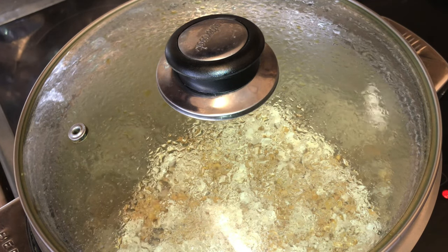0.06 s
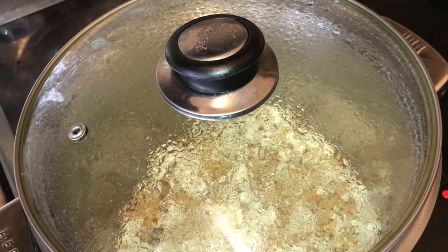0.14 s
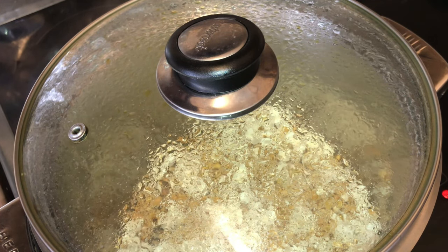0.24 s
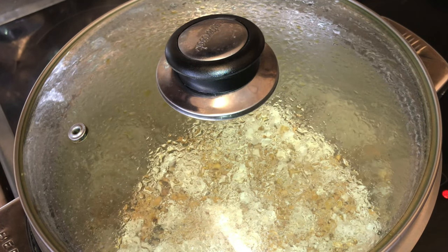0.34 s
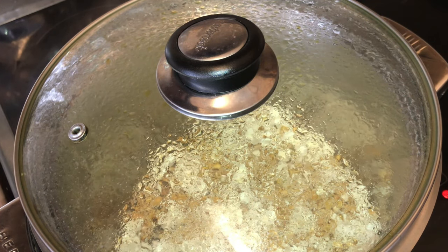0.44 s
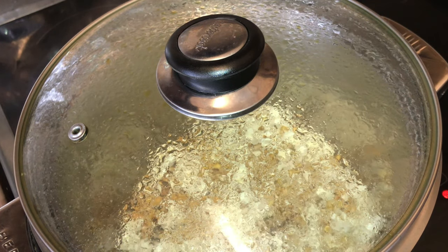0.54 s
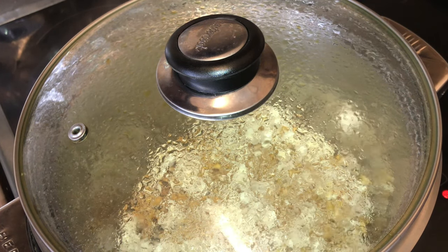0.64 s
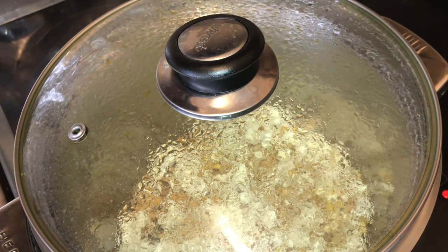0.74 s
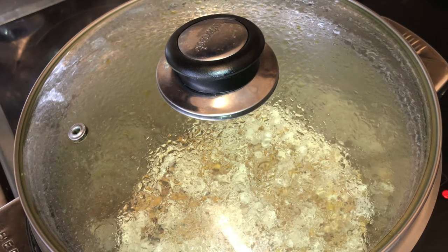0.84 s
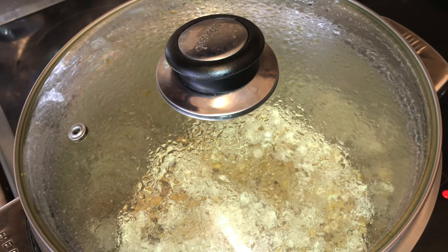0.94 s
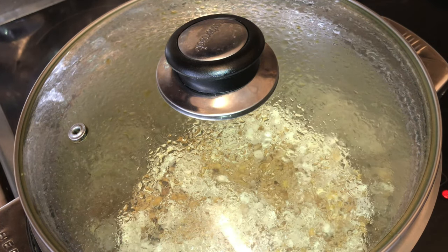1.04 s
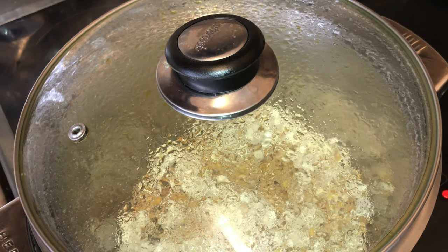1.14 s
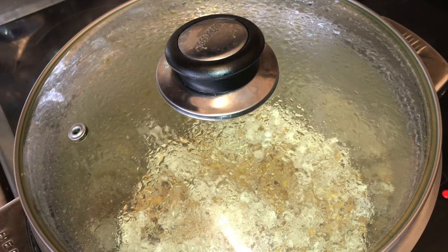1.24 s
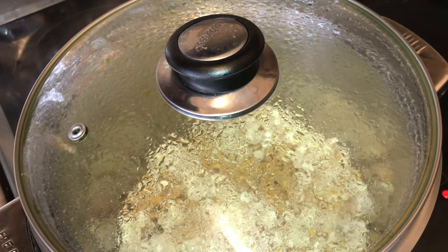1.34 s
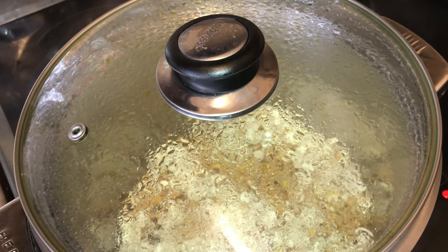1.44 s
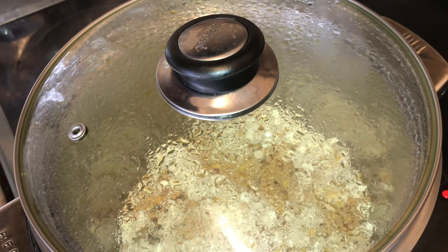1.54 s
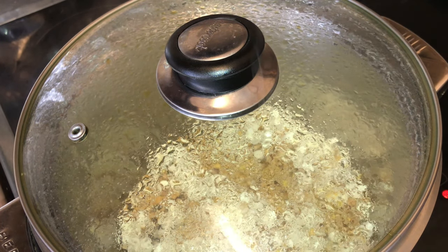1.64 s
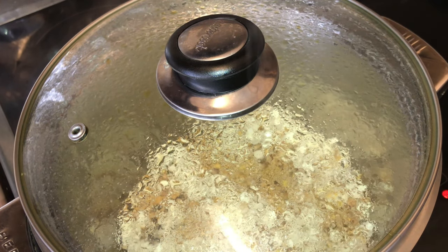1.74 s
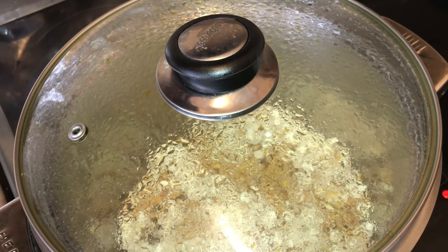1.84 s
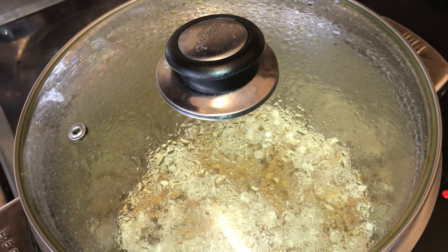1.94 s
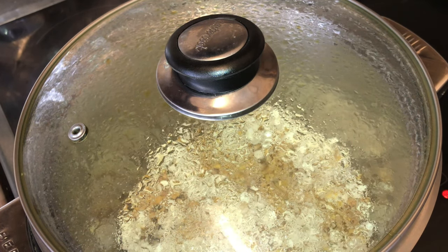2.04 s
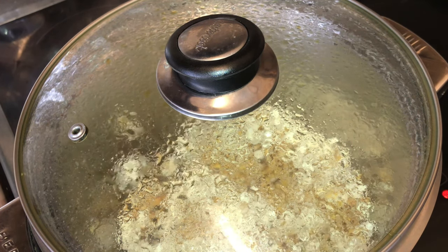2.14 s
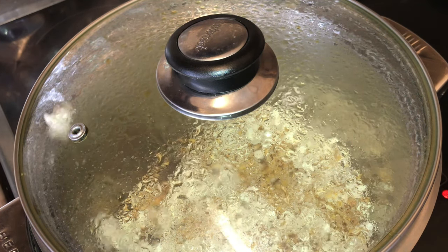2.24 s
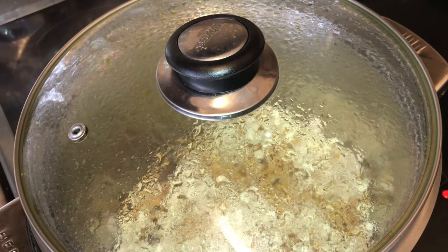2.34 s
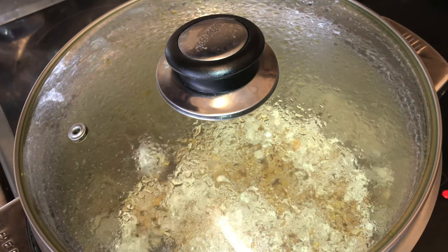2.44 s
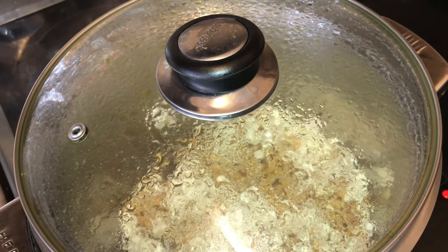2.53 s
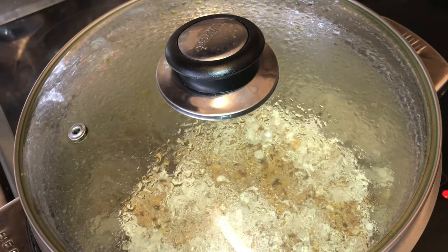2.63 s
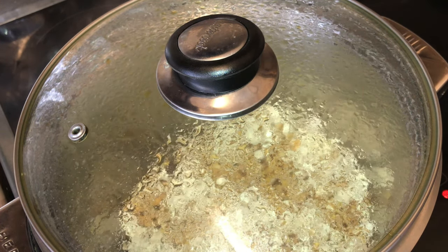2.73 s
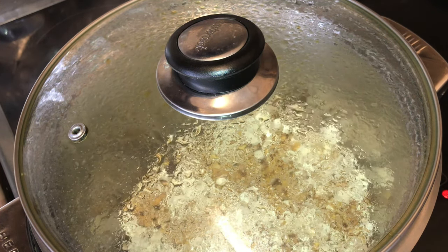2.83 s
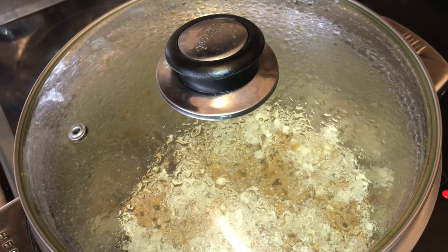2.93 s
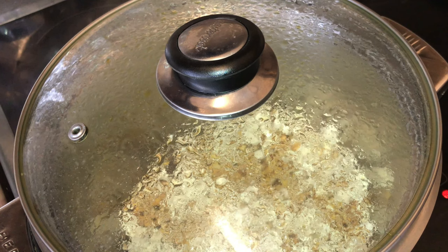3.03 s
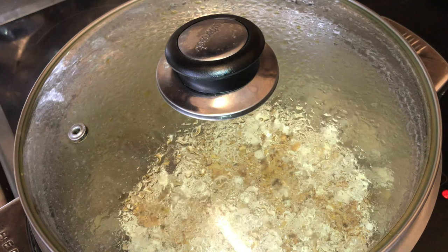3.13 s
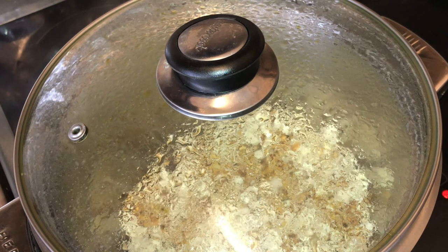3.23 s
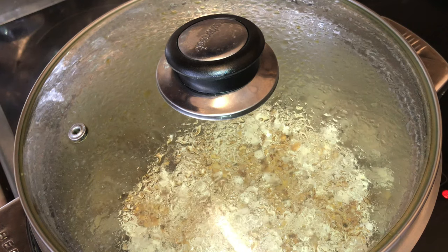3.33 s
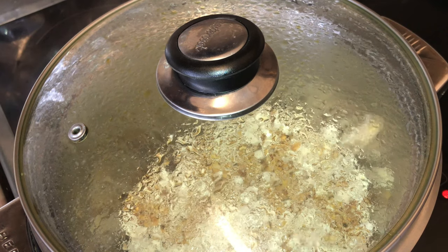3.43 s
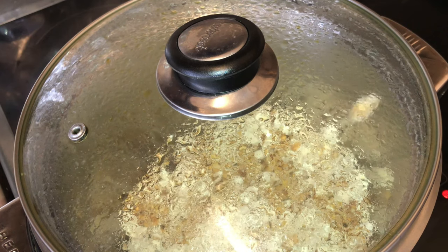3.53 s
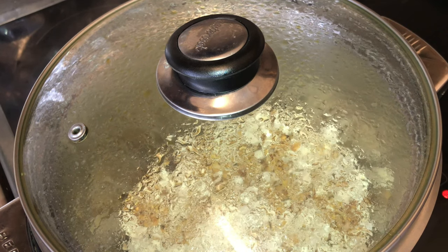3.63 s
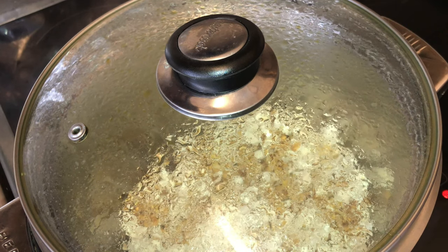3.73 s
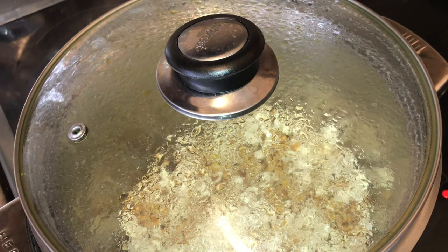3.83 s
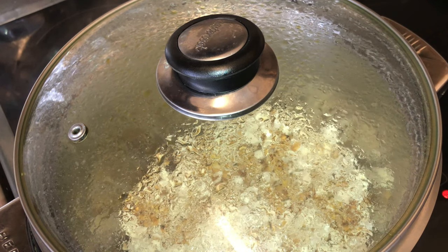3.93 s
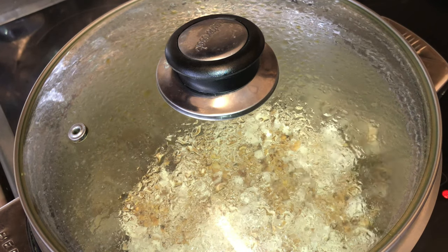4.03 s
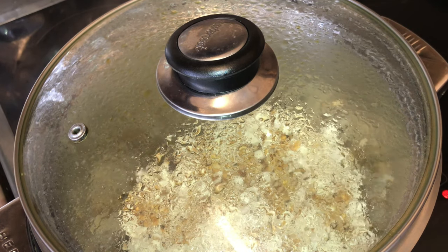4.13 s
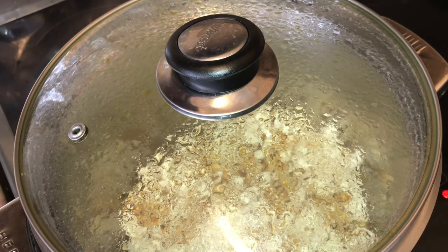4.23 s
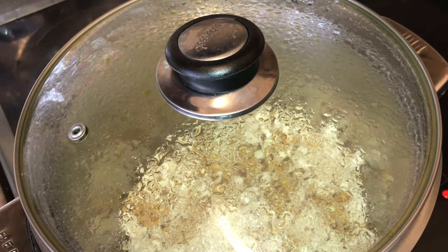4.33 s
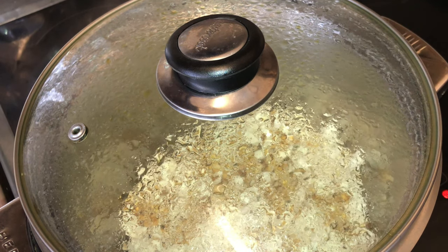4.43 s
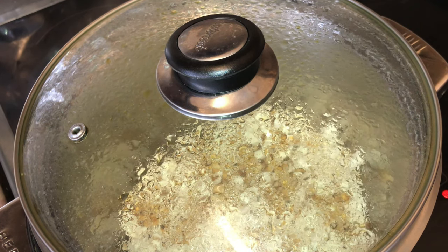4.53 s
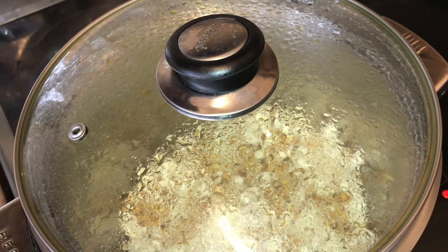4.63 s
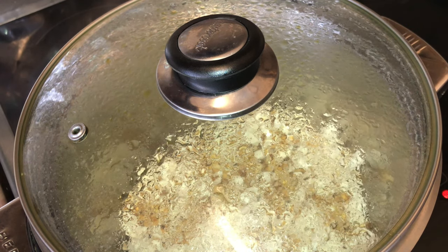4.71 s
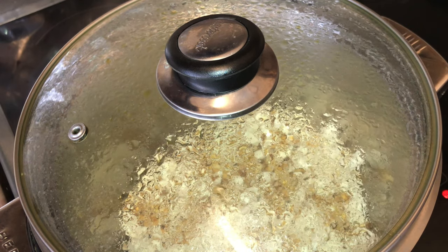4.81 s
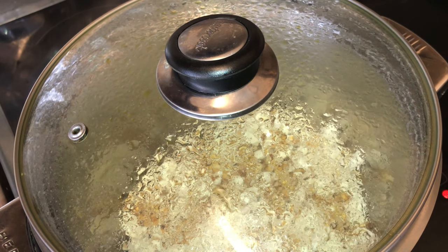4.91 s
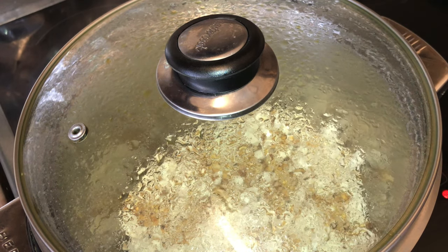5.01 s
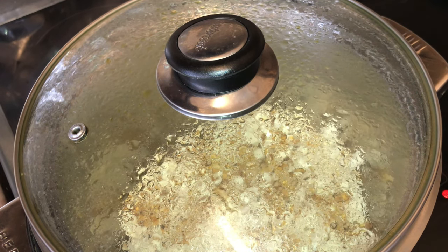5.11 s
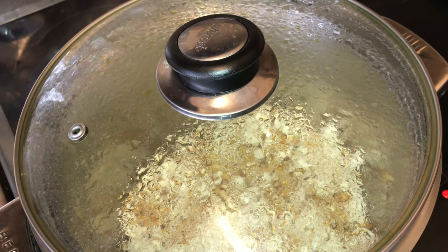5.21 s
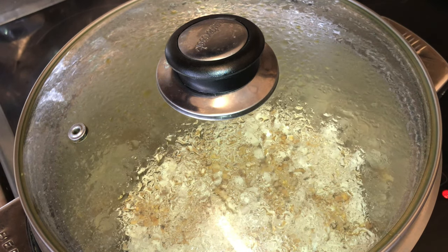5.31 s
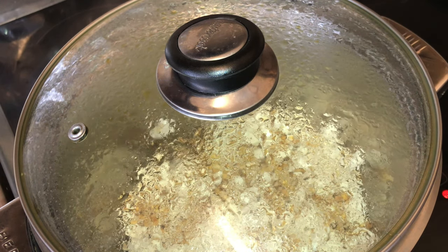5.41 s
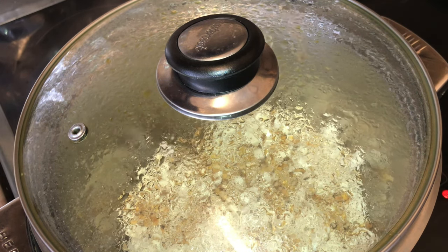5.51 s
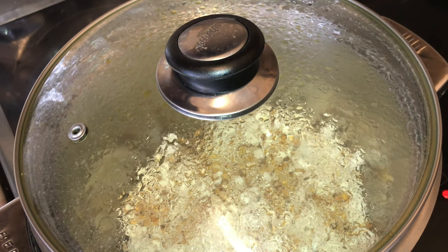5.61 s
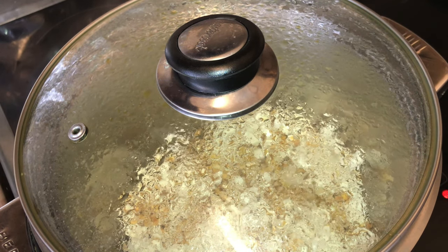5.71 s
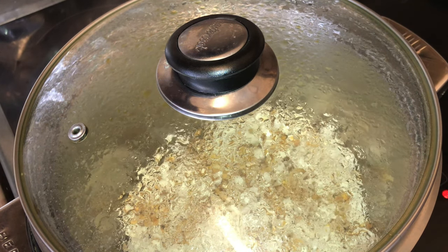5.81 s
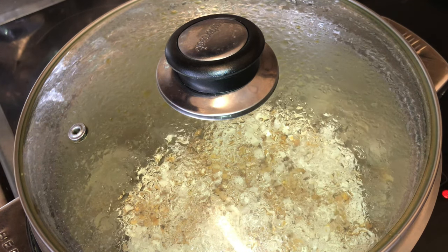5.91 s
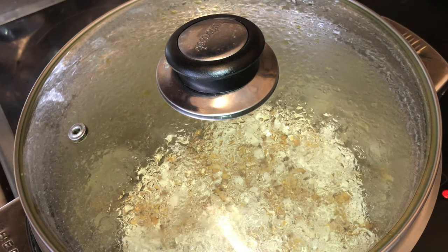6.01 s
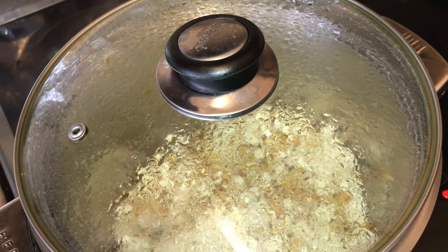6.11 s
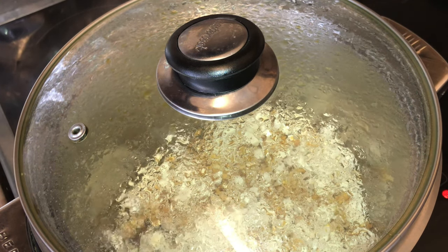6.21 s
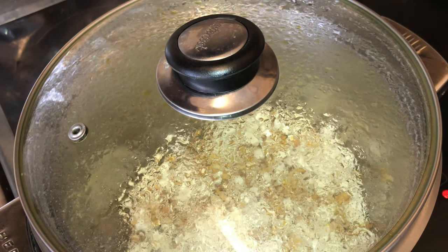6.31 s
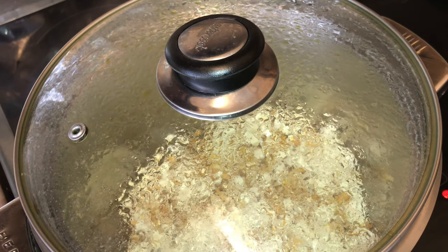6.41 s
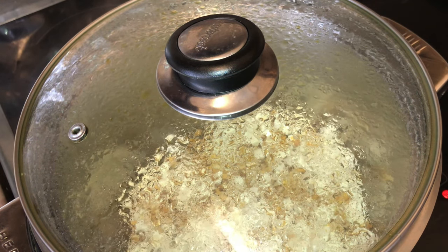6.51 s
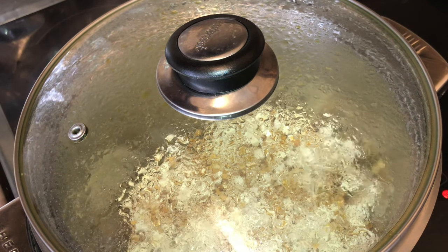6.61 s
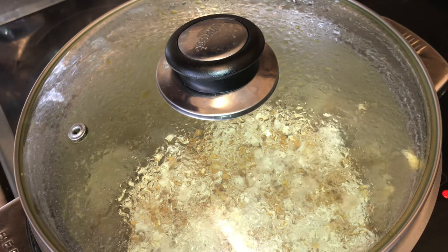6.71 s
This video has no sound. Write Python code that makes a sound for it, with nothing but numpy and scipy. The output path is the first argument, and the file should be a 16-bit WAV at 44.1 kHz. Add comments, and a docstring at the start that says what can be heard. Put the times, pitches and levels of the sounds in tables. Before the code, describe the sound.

Popcorn bursts irregularly under a glass lid close by on the right, with sharp cracks, lid rattles, sizzling oil and a passing engine behind.

```python
"""Popcorn under a glass lid

Popcorn bursts in a steel pot: each burst cracks, thumps the shut-in air and rings the lid, while thrown flakes
tap the lid, hard kernels knock on the steel, short rattles tick, and oil sizzles and spits. Snaps are flickering
noise in three ranges; lid, wall and air are banks of decaying modes. Through a window come road noise, an engine
drone and a bird made of sine partials. Heard by a head with the pot at its right ear.
"""
import sys
import numpy as np
from scipy import signal
from scipy.fft import rfft, irfft
from scipy.io import wavfile

SR = 44100
rng = np.random.default_rng(int(sys.argv[2]) if len(sys.argv) > 2 else 0)


def wrap_up_sound(samples):
    """Save the sound to the file named by the first command line argument, as 16-bit audio."""
    columns = np.atleast_2d(samples).T
    # keep every value between -1 and 1, then stretch to whole-number steps
    tamed = np.clip(columns, -1, 1)
    steps = np.round(tamed * 32767).astype(np.int16)
    wavfile.write(sys.argv[1], SR, steps)


N = 297978


def amp(db):
    """Decibels to a linear gain."""
    return 10 ** (np.asarray(db) / 20)


def rms_of(x):
    """Effective level of a signal."""
    return np.sqrt(np.mean(x ** 2))


def rms_one(x):
    """Scale a signal to rms 1."""
    return x / np.sqrt(np.mean(x ** 2) + 1e-20)


def samples_of(start_s):
    """Start times as sample numbers."""
    return np.round(start_s * SR).astype(int)


def in_time(rows):
    """Glide every column of a table from row to row along its start_s."""
    start_s, *columns = np.transpose(rows)
    return [np.interp(np.arange(N) / SR, start_s, column) for column in columns]


def band(x, low_hz, high_hz):
    """Keep the range between two frequencies."""
    return signal.sosfilt(signal.butter(2, [low_hz, high_hz], "band", fs=SR, output="sos"), x)


def high_pass(x, order, hz):
    """Take out the bass below a frequency."""
    return signal.sosfilt(signal.butter(order, hz, "high", fs=SR, output="sos"), x)


def peaking(x, hz, width_hz, gain_db):
    """A lift or a dip around one frequency."""
    a, w, q = np.sqrt(amp(gain_db)), 2 * np.pi * hz / SR, np.pi * width_hz / SR
    zeros = [1 + q * a, -2 * np.cos(w), 1 - q * a]
    poles = [1 + q / a, -2 * np.cos(w), 1 - q / a]
    return signal.lfilter(zeros, poles, x)


def coloured(spectrum):
    """Steady noise with the given dB per Hz; rms 1."""
    hz, db = np.transpose(spectrum)
    bins_hz = np.arange(1, N // 2 + 2) * SR / N
    curve_db = np.interp(np.log(bins_hz), np.log(hz), db)
    return rms_one(irfft(rfft(rng.standard_normal(N)) * amp(curve_db), N))


def drift(rate_hz):
    """Slow random wander, spread 1: noise through two equal low-pass poles, made at every 40th sample."""
    r = np.exp(-80 * np.pi * rate_hz / SR)
    slow = signal.lfilter([1], [1, -2 * r, r * r], rng.standard_normal(N // 40 + 2002))[2000:]
    return np.interp(np.arange(N) / 40, np.arange(len(slow)), rms_one(slow))


def stir(at, db, t60_s):
    """Each event adds a gain that dies away."""
    kicks = np.full(N, 1e-9)
    kicks[at] = amp(db)
    return signal.lfilter([1], [1, -amp(-60 / (t60_s * SR))], kicks)


def struck(modes, at, blow_db, spread_db, rough_db, in_step=False):
    """Blows ring decaying modes, each with a strength and sign of its own; blow_db may have a row per mode.

    Each mode has a quickly dying neighbour, which makes the start of the ring clank.
    A pressure pulse pushes all modes in step.
    """
    out = np.zeros(N)
    blow_db = np.broadcast_to(blow_db, (len(modes), len(at)))
    for k, (hz, db, t60_s) in enumerate(modes):
        neighbour = (0.0296 * (-1) ** k, rough_db, .45)
        for detune, gain_db, life in [(0, 0, 1), neighbour]:
            chance = rng.standard_normal((len(at), 2))
            sign = 1 if in_step else np.sign(chance[:, 1])
            clicks = np.full(N, 1e-18)
            clicks[at] = amp(blow_db[k] + db + gain_db + spread_db * chance[:, 0]) * sign
            r = amp(-60 / (t60_s * life * SR))
            w = 2 * np.pi * hz * (1 + detune) / SR
            out += signal.lfilter([0, np.sin(w)], [1, -2 * r * np.cos(w), r * r], clicks)
    return out


UNEVEN_DB, BLOCK_SAMPLES = 5, 2048   # spread of the spectrum's bins; how long one spectrum lasts


def uneven_noise():
    """Noise with an uneven spectrum, drawn anew for every block of samples; rms 1."""
    blocks = rfft(rng.standard_normal((N // BLOCK_SAMPLES + 1, BLOCK_SAMPLES)))
    peaks = amp(UNEVEN_DB * rng.standard_normal(blocks.shape))
    return rms_one(irfft(blocks * peaks).ravel()[:N])


def cracks(at, t60_s, levels_db, rise_s=0.0012):
    """Clusters of snaps: flickering uneven noise in three ranges of their own level, the higher dying sooner."""
    out, t = np.zeros(N), np.arange(int(.2 * SR)) / SR
    ranges = [(2820, 6060, 1.0), (5710, 8130, 0.84), (9100, 14250, 0.66)]   # low Hz, high Hz, share of the t60
    for (low_hz, high_hz, quick), db in zip(ranges, levels_db):
        shape = np.zeros(N + len(t))
        for i, gain, life in zip(at, amp(db), np.clip(t60_s, .005, .3)):
            shape[i:i + len(t)] += gain * (1 - np.exp(-t / rise_s)) * amp(-60 * t / (life * quick))
        noise = uneven_noise()
        flicker_db = 2.8 * band(rng.standard_normal(N), 160, 1490) / 0.22
        snaps = noise * amp(flicker_db)
        out += band(shape[:N] * snaps / rms_of(band(snaps, low_hz, high_hz)), low_hz, high_hz)
    return out


SIZZLE_DB = -79.5   # quiet level of oil and steam
# splash: level after a burst of average brightness, its share of the brightness swing, time to calm
SPLASH_DB, SPLASH_FOLLOWS, SPLASH_T60_S = -62, 0.36, 0.22


def sizzle():
    """Tiny bubbles snap in clumps; each burst splashes oil, which hisses up and calms."""
    start_s, crack_db, _, top_db, *_ = np.transpose(BURSTS)
    bright_db = crack_db + top_db
    splash_db = SPLASH_DB + SPLASH_FOLLOWS * (bright_db - bright_db.mean())
    splash = stir(samples_of(start_s), splash_db, SPLASH_T60_S)
    born = rng.random(N) < 4000 * amp(3.5 * drift(25)) / SR   # about 4000 bubbles a second
    sizes = amp(2.6 * np.minimum(rng.exponential(1, N), 5))
    snaps = born * sizes * rng.choice([-1, 1], N)
    return (amp(SIZZLE_DB) + splash) * rms_one(band(snaps, 1300, 10700))


# the passing street: start_s, roar_db (before a fixed lift), engine_hz (firing rate), engine_db
TRAFFIC = [(0, -70.5, 64.3, -86), (3.4, -63, 60, -83.5), (4.1, -62, 57.1, -70), (4.4, -60, 61.3, -74),
           (4.72, -59.5, 62.4, -66.5), (5.25, -60, 63.5, -66.5), (5.45, -58, 53.3, -61.5),
           (5.7, -58, 51.9, -60.5), (6.4, -55.5, 51.5, -58.5), (6.76, -54, 54, -64.5)]
# tyre roar spectrum: pitch_hz, level_db (per Hz)
TYRE_ROAR = [(44, -28), (75, 2), (125, -14), (301, -7), (500, -14.5), (750, -3), (942, -0.5), (1460, -7.5),
             (3220, -20), (5000, -40), (6500, -59)]


def street():
    """Tyre roar swells; the engine drones on its firing rate and two multiples."""
    roar_db, engine_hz, engine_db = in_time(TRAFFIC)
    phase = 2 * np.pi * np.cumsum(engine_hz * (1 + 0.012 * drift(5))) / SR
    drone = 1.3 * np.sin(phase) + 0.04 * np.sin(2 * phase) + 0.55 * np.sin(3 * phase)
    engine = amp(engine_db + 1.5 * drift(12)) * drone
    roar = amp(roar_db + 2.5 + 0.36 * drift(20.0)) * coloured(TYRE_ROAR)
    return engine + roar


# still air and appliances: pitch_hz, level_db (per Hz)
ROOM_SPECTRUM = [(18, -27), (30, 0.5), (81, -4), (280, 2.5), (684, -4), (1280, -4), (1810, -30.5),
                 (7270, -17.5), (8980, -29.5), (12000, -21), (16000, -24)]
ROOM_TONE_DB = -65.5
# mains hum: pitch_hz, level_db (rms)
MAINS_HUM = [(100, -75.5)]


def room_tone():
    """Still air and appliances as wandering coloured noise, with their hum as a sine."""
    t = np.arange(N) / SR
    hum = 0
    for hz, db in MAINS_HUM:
        hum = hum + amp(db + 0.81 * drift(11)) * np.sqrt(2) * np.sin(2 * np.pi * hz * t)
    return amp(ROOM_TONE_DB + 3.1 * drift(21.0)) * coloured(ROOM_SPECTRUM) + hum


# bursts, and flakes hitting the lid: start_s, crack_db (peak), thump_db (against the crack),
# top_db (swing of the crack's top range), crack_t60_s (held to 0.005-0.3 s), lid_tilt_db (per octave)
BURSTS = [(0.0034, -51, -0.5, -3, 0.024, -4), (0.0545, -53.5, -9.5, 5, 0.012, -7),
          (0.371, -55.5, -20, -3, 0.14, -21), (0.4992, -53.5, -1, 2.5, 0.15, 2.5),
          (0.5551, -56.5, 3, 9, 0.09, 3), (0.6052, -51.5, 1, -4.5, 0.16, 2),
          (0.627, -49, -4.5, -30, 0.15, -1), (0.6745, -51.5, -5.5, -20, .15, -3),
          (0.71, -39.5, -5.5, -1, 0.014, -2.5), (0.759, -42, -14.5, -2, 0.058, 6),
          (0.9293, -53.5, 1, -1.5, 0.094, 1.5), (0.945, -45.5, -6.5, -41, 0.034, 3),
          (1.1868, -43, -31, -10, 0.23, -6), (1.2621, -32, -20, -2.5, 0.039, 2),
          (1.3206, -33.5, -15, -10, 0.026, -3.5), (1.382, -30.5, -52, -35.5, 0.06, 1),
          (1.4104, -25, -19, 3.5, 0.038, 3.5), (1.5752, -34.5, -20.5, -6.5, 0.032, 2),
          (1.6843, -50.5, -25, -4, 0.2, -2), (1.7088, -44.5, -14.5, -0.5, 0.046, 1),
          (1.742, -40.5, -22.5, -37.5, 0.036, 1), (1.9622, -51, -1.5, 0, 0.043, -2),
          (1.9777, -40.5, -10.5, -13.5, 0.082, 2), (2.014, -52, -1.5, -12, 0.025, 4),
          (2.18, -33, -13, 4, 0.08, 2.5), (2.202, -31, -10, -19.5, 0.078, -2),
          (2.24, -22.5, -75, -11.5, 0.032, 32), (2.31, -50, 1.5, -1, 0.056, 2),
          (2.326, -40.5, -12, -2, 0.083, 8), (2.3631, -23.5, -18.5, -22, 0.012, -1.5),
          (2.422, -26.5, -10, -8.5, 0.042, 0.5), (2.481, -44, -7.5, -2.5, 0.043, -5),
          (2.7362, -61.5, 8.5, -21.5, .046, 5), (2.777, -47.5, 3.5, -3, 0.069, -13),
          (2.8044, -28.5, -12, -14, 0.054, -8.5), (2.903, -34, -46, -25, 0.1, -5),
          (2.9808, -45, -17, 3.5, 0.036, -2), (3.021, -54.5, -1.5, -4, 0.03, -7),
          (3.0435, -56, 1, 2.5, 0.056, 5.5), (3.1484, -24.5, -25.5, -3, 0.038, 4),
          (3.1995, -63.5, 14.5, -30, .043, -1), (3.4206, -19.5, -19, -3, 0.04, -2.5),
          (3.5015, -34.5, -17, -3, 0.02, -6), (4.037, -49.5, -1.5, -5.5, 0.21, -7.5),
          (4.079, -53, -1.5, -11.5, 0.32, 0), (4.167, -53.5, -24, -16, 0.5, -2),
          (4.2106, -16.5, -25, -13.5, 0.014, 2.5), (4.6771, -25, -18, -7, 0.032, -8),
          (4.792, -45, -13, -14.5, 0.036, 3.5), (5.4331, -39, -10.5, -8, 0.033, -5),
          (5.442, -40, 0.5, -7, 0.056, 0.5), (5.5361, -23.5, -28, -39, 0.046, 7.5),
          (5.7227, -40, -12.5, -11, 0.041, 0), (5.7349, -42, -25, 0.5, 0.046, -12),
          (6.0463, -38, -4.5, -3.5, 0.087, -1), (6.174, -34.5, -9, -12, 0.11, 0),
          (6.1916, -40, -8.5, 11.5, 0.035, 7), (6.2261, -10.5, -47, -17, 0.023, 4),
          (6.3567, -32.5, -37, -9, 0.17, -10), (6.441, -49.5, -3, -6.5, 0.19, 0.5),
          (6.4813, -51, 2, -21, 0.021, -3), (6.654, -43.5, -4.5, -6.5, 0.31, 2.5),
          (6.6867, -41.5, -9.5, -19, 0.11, 0), (6.7434, -28.5, -22, -12, 0.017, 2)]
# air shut in the pot: pitch_hz, level_db, t60_s
POT_AIR = [(267, -1, 0.095), (174, -4.5, 0.057), (310, -10.5, 0.043)]
# the lid resting on the rim, damped: pitch_hz of each mode
LID_MODES_HZ = [1287, 1597, 2092, 2625, 2800, 3133, 3803, 4400, 4740, 5320, 6400, 7300]
# for each lid mode: level_db, t60_s
LID_RING = [(-1, 0.15), (-4.5, 0.13), (-5.5, 0.12), (-8, 0.12), (-4, 0.078), (-3, 0.083), (-5.5, 0.066),
            (-17.5, 0.11), (-14, 0.14), (-3.5, 0.046), (-8, 0.062), (-15, 0.025)]
CREST_DB = 9.5   # peak of a crack over its body
UPPER_DB, UPPER_FOLLOWS, TOP_DB = 12, 0.41, 13.5   # upper range above the body, its share of the top's swing; top
AIR_DB, LID_DB, LID_FOLLOWS = 1, -5.5, 0.58   # air above the thump; lid against the crack, its share of the thump
FLAKE_DB, FLAKE_SPREAD_DB, SETTLE_S = -23.5, 48, 0.25   # strongest flake below the stir, spread; t60 of the stir


def pops():
    """Each burst tears the hull with a crack, pushes the air and strikes the lid; thrown flakes tap after it."""
    start_s, crack_db, thump_db, top_db, crack_t60_s, tilt_db = np.transpose(BURSTS)
    at, body_db = samples_of(start_s), crack_db - CREST_DB

    # flakes: small hits at random moments, weaker as the heap settles
    chance = rng.random((900, 2))
    flake_at = (chance[:, 0] * N).astype(int)
    stir_db = 20 * np.log10(stir(at, crack_db, SETTLE_S)[flake_at])
    flake_db = stir_db + FLAKE_DB - FLAKE_SPREAD_DB * chance[:, 1]

    upper_db = body_db + UPPER_DB + UPPER_FOLLOWS * top_db
    out = cracks(at, crack_t60_s, [body_db, upper_db, body_db + TOP_DB + top_db])
    out += cracks(flake_at, np.full(len(flake_at), .035), [flake_db, flake_db - 14.0, flake_db + 7.5])

    air = struck(POT_AIR, at, crack_db + thump_db + AIR_DB, spread_db=1.5, rough_db=-13.5, in_step=True)
    out += band(air, 130, 560) * amp(1.5 * drift(40))   # a soft push, unsteady in level

    lid_db = np.append(crack_db + LID_DB + LID_FOLLOWS * thump_db, flake_db + 1.0)
    octaves = np.log2(np.array(LID_MODES_HZ)[:, None] / 2200)
    lid_db = lid_db + octaves * np.append(tilt_db, 0 * flake_db)   # flakes have no tilt
    modes = np.column_stack([LID_MODES_HZ, LID_RING])
    lid = struck(modes, np.append(at, flake_at), lid_db, spread_db=3.0, rough_db=-5.5)
    return out + band(lid, 1000, 12000) * amp(3.0 * drift(90))   # the lid chatters on the rim


# short rattles of dense ticks on wall and lid, near the bursts: start_s, length_s, level_db
TICK_RATTLES = [(0.02, 0.15, -74.5), (0.559, 0.16, -72.5), (0.954, 0.33, -76), (1.204, 0.077, -78),
                (1.429, 0.17, -70.5), (4.024, 0.15, -70.5)]
# the steel wall: pitch_hz of each mode
WALL_MODES_HZ = [1922, 1992, 2159, 2396, 2778, 2832, 2993, 3133, 4134, 4245, 4409, 5572, 5733, 7330]
RATTLE_PER_S, RATTLE_T60_S = 250, 0.044


def rattle():
    """Dense uneven ticks into the middle modes of wall and lid, damped by the heap."""
    t = np.arange(N) / SR
    level = 0
    for start_s, length_s, db in TICK_RATTLES:
        fade = np.clip(2 * (1 - (t - start_s) / length_s), 0, 1)   # full for half the rattle, then down to nothing
        level = level + amp(db) * (t > start_s) * fade
    at = np.flatnonzero((rng.random(N) < RATTLE_PER_S / SR) & (level > 0))
    modes = [(hz, 0, RATTLE_T60_S) for hz in WALL_MODES_HZ[3:7] + LID_MODES_HZ[3:4]]
    return struck(modes, at, 20 * np.log10(level[at]), spread_db=5.0, rough_db=-14.5)


# calls, each a held note that glides away:
# start_s, length_s, hold_s, first_pitch_hz, last_pitch_hz, level_db, overtones_db
BIRD_CALLS = [(.152, .03, .001, 1130, 1330, -65, -20), (.765, .08, .01, 1310, 1190, -68, -10),
              (1.895, .065, 0, 1770, 1560, -80, 6), (4.635, .225, .04, 1420, 1040, -67, 1),
              (5.282, 0.155, 0.07, 1410, 1150, -68, 0), (5.816, .115, 0.013, 1740, 1475, -72, 7),
              (5.925, .115, 0.046, 1406, 1206, -67, 0), (6.502, 0.2, 0.0041, 1650, 1330, -69, -2)]
# colour of the throat: pitch_hz, gain_db
THROAT = [(1200, 2.5), (2500, 0), (3300, 2), (4250, 1), (4800, -8), (6500, -20)]
CALL_BEND = 0.6   # under 1 the glide is quickest at first
CALL_EDGE_S, CALL_FLUTTER_DB = .015, 2.5   # fade in and out; unsteadiness
CALL_DULLS_DB = -7   # change of the overtones by the end of a call


def bird():
    """Gliding calls, nearly all falling: four clear partials, coloured by the throat, unsteady in level."""
    out = np.zeros(N)
    for start_s, length_s, hold_s, first_hz, last_hz, level_db, overtones_db in BIRD_CALLS:
        t = np.arange(int(length_s * SR)) / SR
        glide = np.clip((t - hold_s) / (length_s - hold_s), 0, 1) ** CALL_BEND
        pitch_hz = first_hz + (last_hz - first_hz) * glide
        phase = 2 * np.pi * np.cumsum(pitch_hz) / SR
        tone = 0
        for k in range(1, 5):
            partial_db = np.interp(k * pitch_hz, *np.transpose(THROAT))
            if k > 1:
                partial_db = partial_db + overtones_db + CALL_DULLS_DB * t / length_s
            tone = tone + amp(partial_db) * np.sin(k * phase)
        edges = np.clip(np.minimum(t, length_s - t) / CALL_EDGE_S, 0, 1)
        out[int(start_s * SR):][:len(t)] += amp(level_db) * edges * tone
    return np.sqrt(2) * out * amp(CALL_FLUTTER_DB * drift(30))


# drops of oil spitting: start_s, level_db, top_db (top range against the level)
OIL_SPITS = [(0.153, -56.5, -0.5), (0.478, -52, -2), (0.536, -52, -10), (0.69, -54, -6), (0.74, -52, -15),
             (1.068, -52.5, -11), (1.139, -48.5, -8), (1.305, -39, -12), (1.54, -50.5, -10),
             (1.86, -60.5, 7), (2.138, -48.5, -7), (2.162, -41.5, -3), (2.274, -42.5, 1),
             (2.4047, -35.5, -10), (2.436, -31.5, -8), (2.722, -54, -10), (2.823, -35.5, -8.5),
             (2.942, -43, -12), (3.132, -39, -8), (3.348, -66, 10), (3.402, -50, -7), (3.741, -61, -10),
             (3.8993, -54.5, -2.5), (4.3, -47, -9), (4.423, -48.5, -9), (4.4382, -51.5, -6),
             (4.49, -49.5, -10), (4.576, -50, -8.5), (4.78, -58, 3), (5.035, -50, -2), (5.16, -49, -6),
             (5.3184, -50.5, -10.5), (5.578, -42.5, -6), (5.8, -49.5, -23), (5.9417, -52, -15),
             (6.0029, -51.5, -12), (6.115, -48.5, -19), (6.2518, -26.5, -25), (6.29, -39, -23),
             (6.326, -41, -10), (6.571, -47.5, -7)]
SPIT_LOW_DB, SPIT_UPPER_DB, SPIT_T60_S = -13, -9.5, 0.094   # two lower ranges against the level; decay


def spits():
    """Small bright cracks that set nothing ringing."""
    start_s, level_db, top_db = np.transpose(OIL_SPITS)
    ranges_db = [level_db + SPIT_LOW_DB, level_db + SPIT_UPPER_DB, level_db + top_db]
    return cracks(samples_of(start_s), np.full(len(start_s), SPIT_T60_S), ranges_db)


# hard kernels on the steel: start_s, level_db, deep_db and high_db (deep and highest modes against it),
# place_deg, deep_place_deg (place on the patterns of the upper and of the deep modes)
KERNEL_KNOCKS = [(1.189, -51.5, -12, -10, 90, 49), (1.3814, -47.5, -10.5, 7, 95, 83),
                 (1.411, -54.5, -20, -1, 31, 50), (2.3584, -40.5, -10, -15, 45, 37),
                 (2.5385, -40.5, -5, -18, 33.7, 8.5), (2.905, -50.5, -7, 5.5, 77, 48),
                 (3.585, -46, -6.5, -19, 40, 39), (4.076, -51.5, -13, -14, 41.5, 45),
                 (5.62, -41.5, -21, -4, 53, 69), (6.2263, -27.5, -22, 1, 82.5, 42)]
# for each wall mode, the deep ones ringing much longer than the lid: level_db, t60_s
WALL_RING = [(-8, 0.5), (-10, 0.7), (-4, 1.8), (-12, 0.3), (-4, 0.28), (-6, 0.17), (-4, 0.21), (-12, 0.22),
             (-7, 0.16), (-2, 0.09), (-8, 0.11), (-11, 0.19), (-8, 0.06), (-12, 0.2)]
# the round wall's modes stand in two patterns, a blow on one's node rings the other: pattern (0 or 1) of each mode
MODE_PATTERN = [0, 0, 1, 1, 0, 0, 1, 1, 0, 0, 1, 1, 0, 1]
DEEP_HZ, HIGH_HZ = 2500, 5000   # deep modes lie below, highest modes above
UPPER_WALL_DB = 2   # dB per octave over all modes
KNOCK_SKID_S = .025   # a kernel skids onto the steel, so the upper ring swells in over this t60
KNOCK_CRACK_T60_S = 0.18


def knocks():
    """Together with a crack, the wall's deep modes ring evenly, the upper ones swelling in unevenly."""
    start_s, level_db, deep_db, high_db, place_deg, deep_place_deg = np.transpose(KERNEL_KNOCKS)
    at, hz = samples_of(start_s), np.array(WALL_MODES_HZ)[:, None]
    angle_deg = np.where(hz < DEEP_HZ, deep_place_deg, place_deg) - 90 * np.array(MODE_PATTERN)[:, None]
    pattern = abs(np.cos(np.radians(angle_deg))) + .02
    blow_db = level_db + 20 * np.log10(pattern) + UPPER_WALL_DB * np.log2(hz / 2900)
    blow_db = blow_db + deep_db * (hz < DEEP_HZ) + high_db * (hz > HIGH_HZ)

    modes, is_deep = np.column_stack([WALL_MODES_HZ, WALL_RING]), hz[:, 0] < DEEP_HZ
    even = struck(modes[is_deep], at, blow_db[is_deep], spread_db=1.5, rough_db=-6)
    uneven = struck(modes[~is_deep], at, blow_db[~is_deep], spread_db=1.5, rough_db=-6)
    swell = 1 - np.minimum(stir(at, 0 * level_db, KNOCK_SKID_S), 1)
    unsteady = amp(3.5 * drift(60)) * swell

    # the upper ranges of the crack follow part of the highest modes
    ranges_db = [level_db - 13, level_db - 3.5 + 0.48 * high_db, level_db - 17 + 0.18 * high_db]
    return even + unsteady * uneven + cracks(at, np.full(len(at), KNOCK_CRACK_T60_S), ranges_db)


# the room's tail: pitch_hz, level_db, t60_s
KITCHEN_TAIL = [(250, -16, 0.2), (1570, -8, 0.13), (4180, -11, 0.25), (12600, -9.5, 0.12)]


def kitchen(x):
    """Diffuse tail: octaves of noise that build up over a few ms and die at their own rates."""
    t, tail = np.arange(int(.5 * SR)) / SR, 0
    hz, db, t60_s = np.transpose(KITCHEN_TAIL)
    for low_hz in 125 * 2. ** np.arange(7):
        centre = np.log(low_hz * 1.4)
        level_db = np.interp(centre, np.log(hz), db)
        life_s = np.interp(centre, np.log(hz), t60_s)
        noise = band(rng.standard_normal(len(t)), low_hz, 2 * low_hz)
        noise = noise * amp(-60 * t / life_s) * (1 - np.exp(-t / 0.0024))
        tail = tail + amp(level_db) * noise / np.sqrt(life_s * SR / 14)
    return signal.fftconvolve(x, tail)[:N]


# paths round the head to the far ear: delay_ms, spread_ms, gain (linear)
HEAD_PATHS = [(0.541, 0.027, 0.25), (0.735, 0.076, 0.32), (0.55, 0.00354, 0.055), (1.28, 0.32, 0.12),
              (1.5, 0.86, 0.074)]
# dip at the far ear: pitch_hz, width_hz, gain_db
HEAD_DIP = (6950, 1500, -22)


def far_ear(near):
    """The head shadows the left ear: late, dull copies arrive round both sides, with a dip in the treble."""
    ms = np.arange(256) / SR * 1000
    shadow = 0
    for delay_ms, spread_ms, gain in HEAD_PATHS:
        path = np.exp(-.5 * ((ms - delay_ms) / spread_ms) ** 2)
        shadow = shadow + gain * path / path.sum()
    return peaking(signal.lfilter(shadow, [1], near), *HEAD_DIP)


# broad resonances of the closed pot: pitch_hz, width_hz, gain_db
POT_RESONANCES = [(2600, 480, 8.5), (4397, 340, 10)]


def scene():
    """The pot colours its own sounds and excites the kitchen; all of it reaches the right ear, then the left."""
    pot = pops() + spits() + knocks() + rattle() + sizzle()
    for resonance in POT_RESONANCES:
        pot = peaking(pot, *resonance)
    pot = high_pass(pot, 2, 140)   # too small to send out deep bass
    near = amp(3.5) * (pot + kitchen(pot) + bird() + street() + room_tone())
    return np.array([far_ear(near), near])


# dip and lift of the microphone: pitch_hz, width_hz, gain_db
MICROPHONE_COLOUR = [(8960, 240, -25.5), (11890, 1180, 6.5)]
CUTOFF_HZ = 16600   # from here up the top is 70 dB down


def record(dry):
    """The microphone drops the deepest bass and has a dip and a lift in the treble; the top is cut."""
    for colour in MICROPHONE_COLOUR:
        dry = peaking(dry, *colour)
    dry = high_pass(dry, 4, 42)
    dry = signal.sosfilt(signal.butter(6, 15300, fs=SR, output="sos"), dry)
    return signal.sosfilt(signal.cheby2(14, 70, CUTOFF_HZ, fs=SR, output="sos"), dry)


dry = scene()
out = record(dry)
wrap_up_sound(out)
```